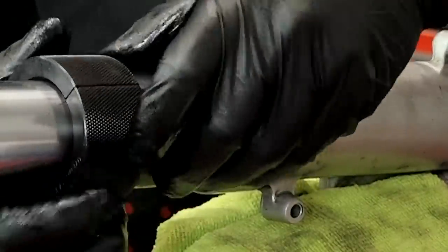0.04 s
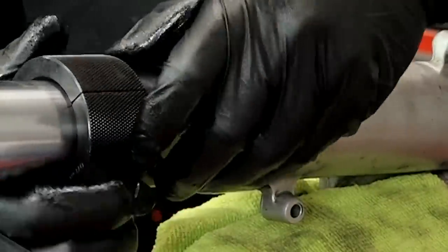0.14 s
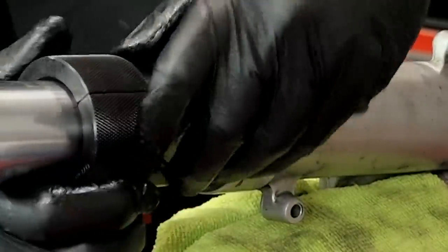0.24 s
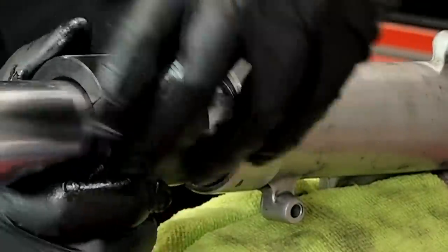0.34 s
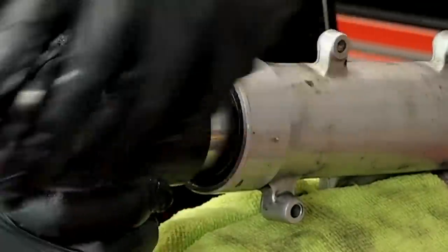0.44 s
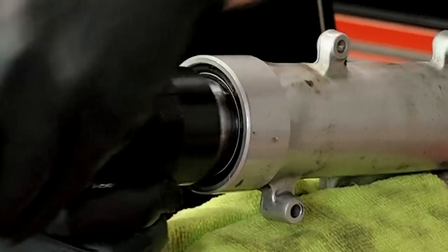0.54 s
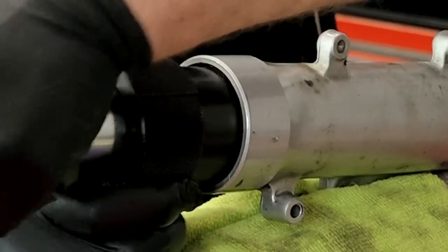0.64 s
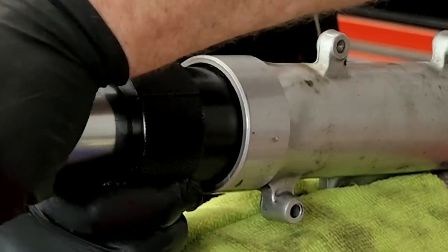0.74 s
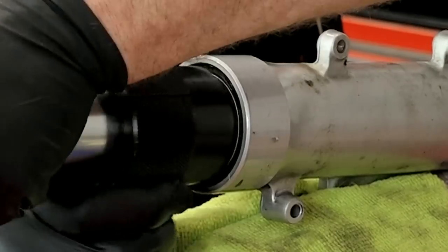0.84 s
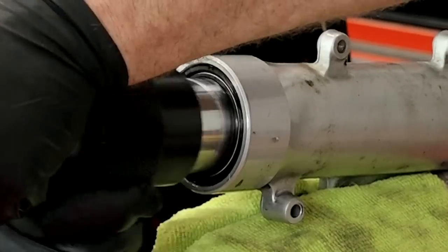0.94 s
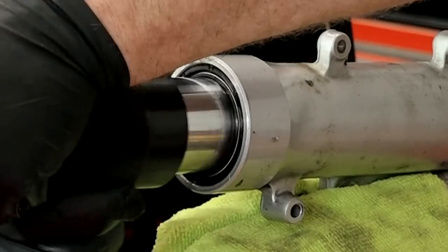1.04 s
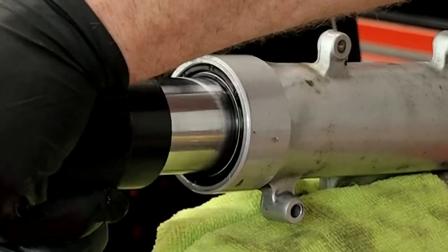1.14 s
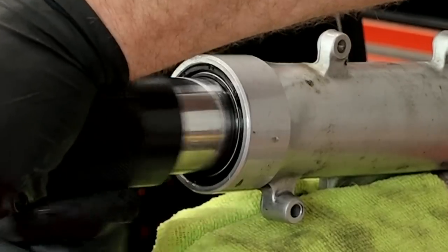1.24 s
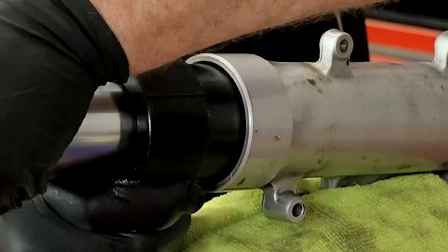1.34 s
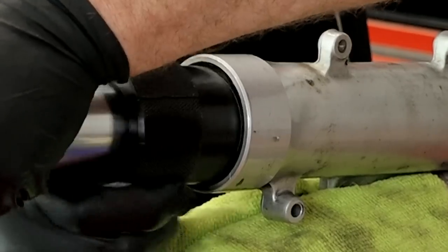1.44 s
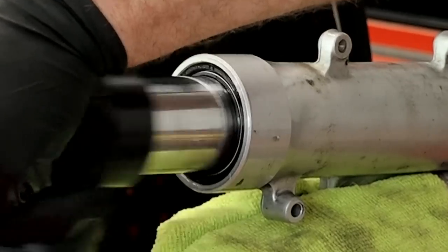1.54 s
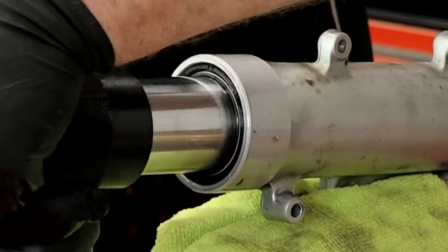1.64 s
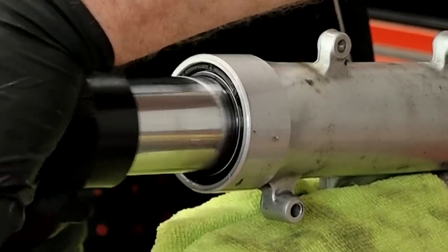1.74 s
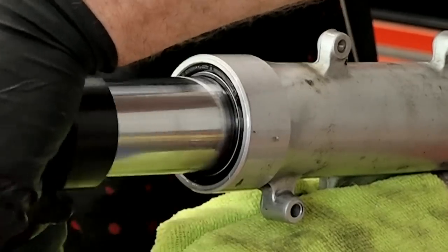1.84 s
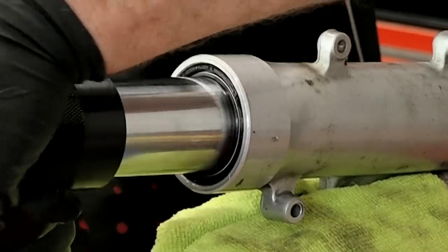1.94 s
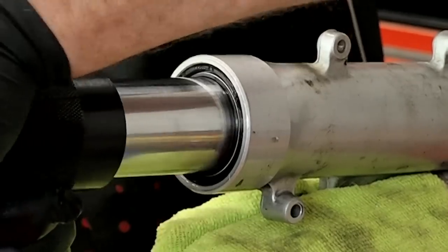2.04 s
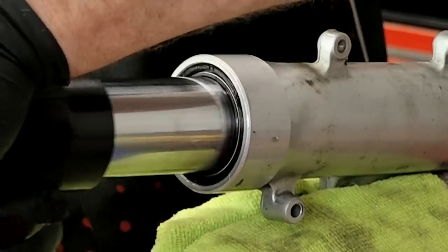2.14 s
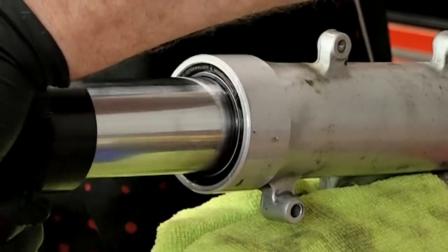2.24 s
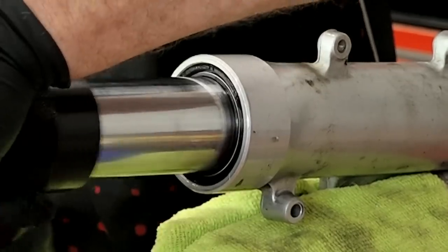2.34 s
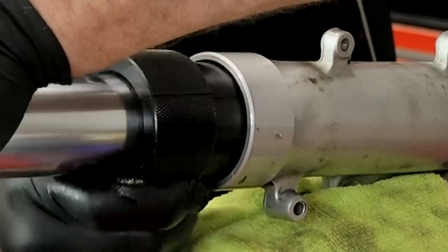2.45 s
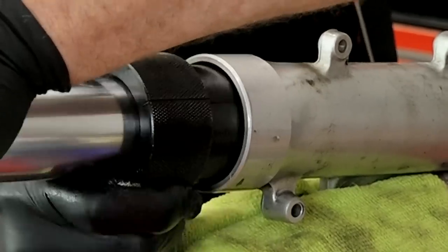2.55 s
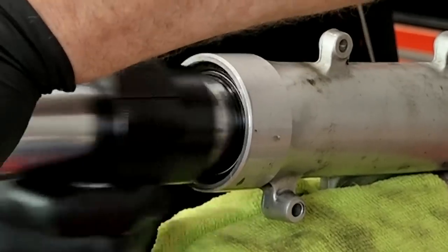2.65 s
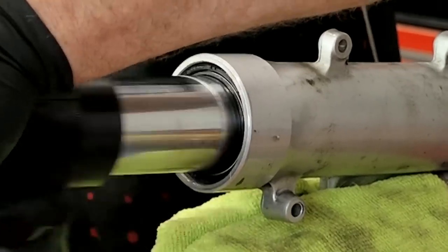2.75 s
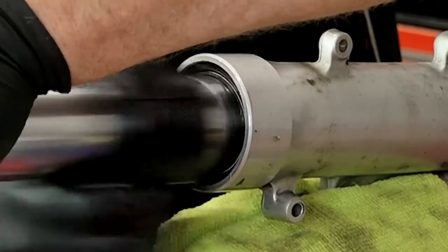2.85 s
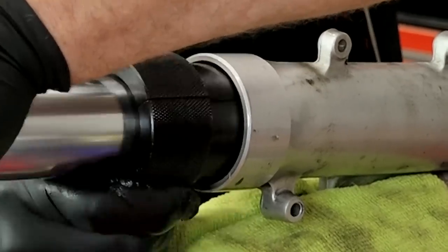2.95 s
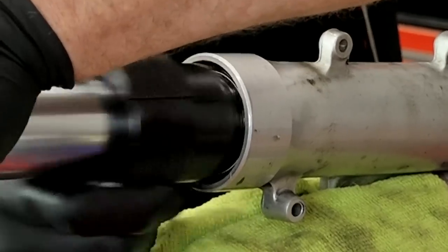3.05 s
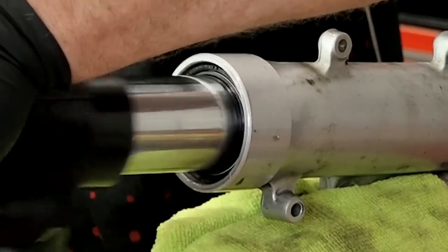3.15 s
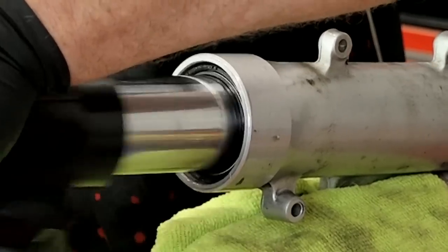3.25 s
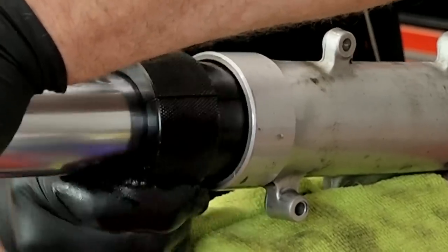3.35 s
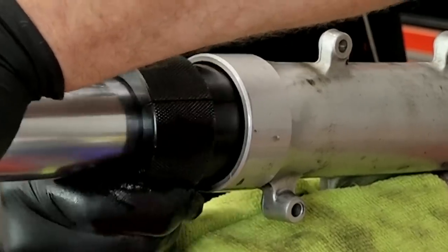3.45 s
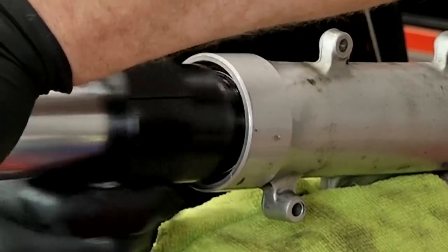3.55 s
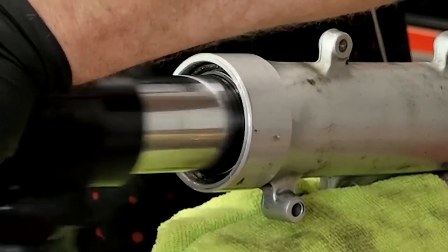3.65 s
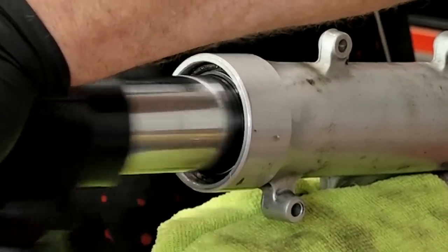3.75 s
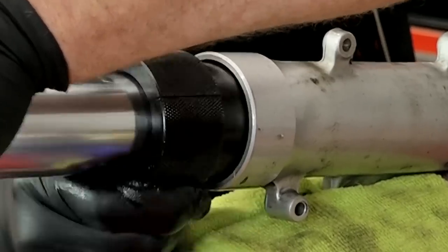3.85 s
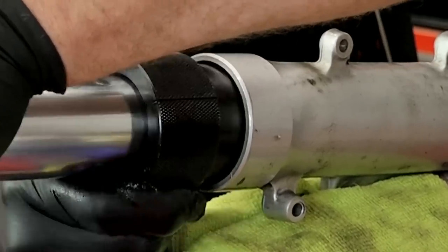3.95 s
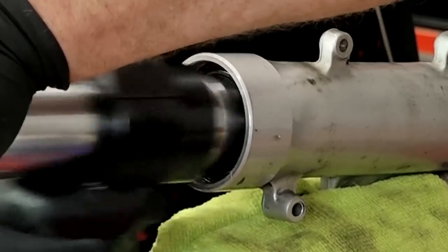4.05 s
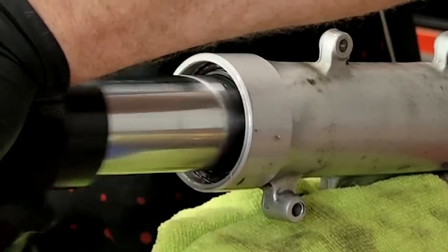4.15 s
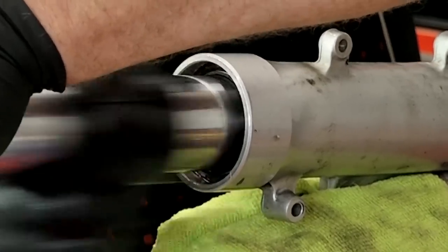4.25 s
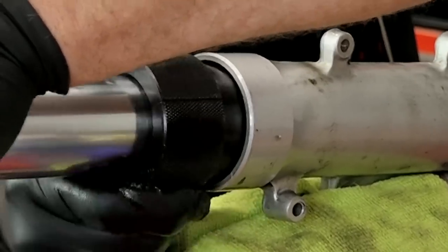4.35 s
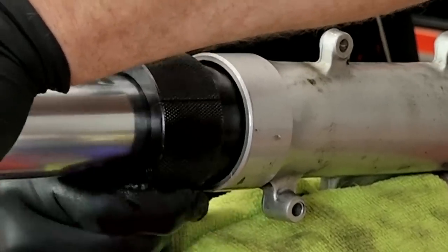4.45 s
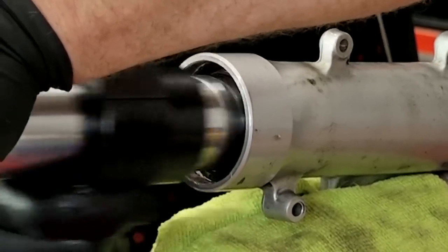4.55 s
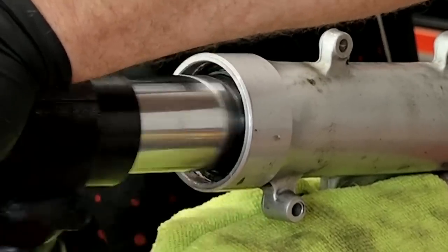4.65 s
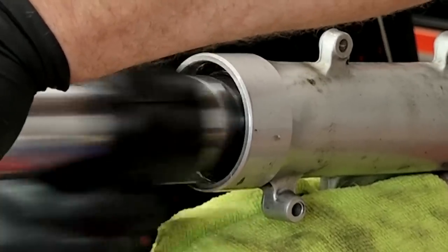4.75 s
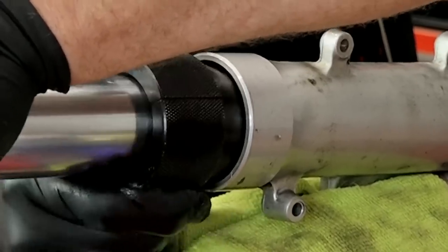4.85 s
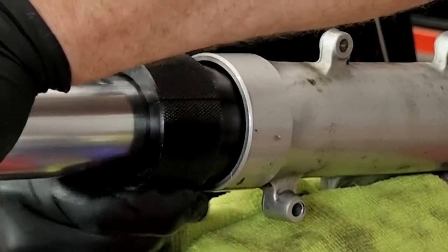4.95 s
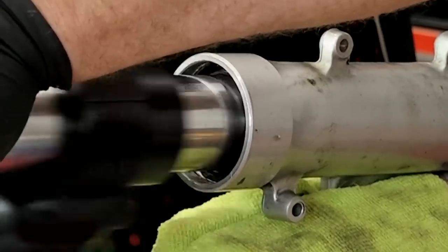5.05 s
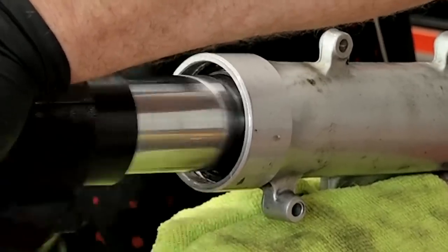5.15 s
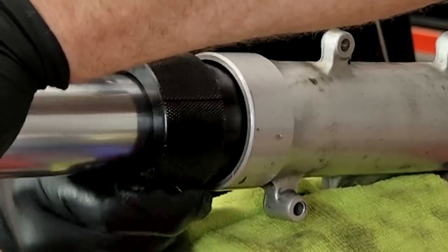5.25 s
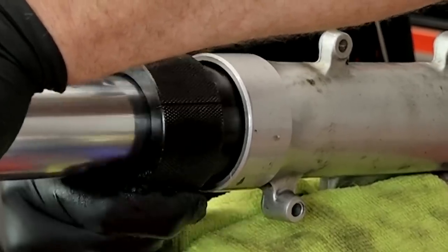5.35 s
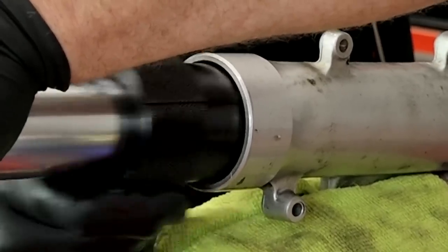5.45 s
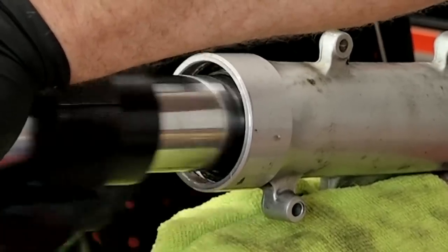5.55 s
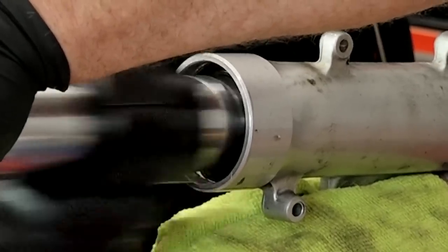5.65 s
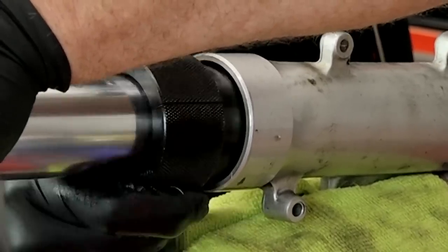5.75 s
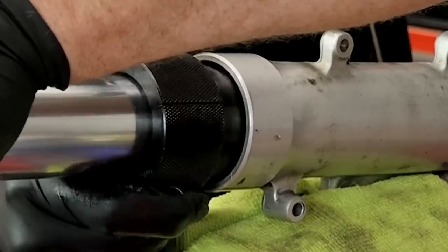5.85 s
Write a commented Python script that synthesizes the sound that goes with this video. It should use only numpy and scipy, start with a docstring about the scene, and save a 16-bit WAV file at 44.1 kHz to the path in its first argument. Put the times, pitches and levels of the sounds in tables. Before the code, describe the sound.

A steel sleeve hisses along a fork tube and slams a seal home in sharp, regular metallic knocks that turn brighter and harder.

```python
"""Driving a seal into a fork leg

In a workshop, gloved hands slide a steel driver sleeve along a fork tube and knock an oil seal into the leg.
The moving sleeve is shaped friction noise; its ticks, clacks, short squeaks and rebounds are contact bursts,
all but the ticks with damped modes. Each blow adds a thud and leg modes, harder and brighter near the seat.
The room answers all but the faint ticks and bumps; the close mono microphone clips the highest peaks softly."""
import sys
import numpy as np
from scipy import signal
from scipy.fft import rfft, irfft, next_fast_len
from scipy.io import wavfile
from scipy.ndimage import map_coordinates

SR = 44100
rng = np.random.default_rng(int(sys.argv[2]) if len(sys.argv) > 2 else 0)


def log_audio(samples):
    """Write samples as a 16-bit WAV file to the path given in sys.argv[1]."""
    # one column per channel
    frames = np.atleast_2d(samples).T
    # limit to full scale, then quantise
    limited = np.clip(frames, -1, 1)
    pcm = np.round(limited * 32767).astype(np.int16)
    wavfile.write(sys.argv[1], SR, pcm)


N = 260489
T = np.arange(8192) / SR  # time axis of one short sound, s

# blows on the seal: start_s, level_db, thud_db (against the blow), crack_hz
BLOWS = [(1.373, -17, -7, 1850), (2.495, -12.5, -6.5, 1920), (2.9369, -17.5, -2, 1820),
         (3.3835, -12, -3.5, 1720), (3.878, -14, -2.5, 1670), (4.351, -15, -1.5, 2030),
         (4.8449, -9.5, -8.5, 1934), (5.3120, -11, -7, 1940), (5.7543, -10, -8, 2380)]
# modes of the steel sleeve and tube: pitch_hz, level_db, t60_s
STEEL_MODES = [(1570, -4, .05), (2160, -2, .04), (2470, -1, .05), (3380, -6, .04), (3810, -3, .04),
               (4339, -6, .04), (5297, -4, .06), (5500, -4, .06), (5930, -6, .05), (6500, -9, .04),
               (8200, -9, .04), (8750, -8, .04), (9230, -9, .05)]
# broad colour of steel meeting steel: frequency_hz, level_db
CRACK_COLOUR = [(500, -16.5), (1150, -3), (1550, -1.5), (1880, 3), (2150, 1), (2480, 1), (3000, -1),
                (3700, 0.5), (4500, -8.5), (7000, -58)]
# bright edge of the steel: frequency_hz, level_db
TREBLE_COLOUR = [(2500, -33), (4000, 3.5), (4750, 1), (5450, 9.5), (6300, 1.5), (7300, -1), (8500, 1.5),
                 (10500, -9.5), (12800, -12.5), (16000, -20)]
# dull colour of the padded leg being bumped or shoved: frequency_hz, level_db
BUMP_COLOUR = [(20, -14), (50, -3), (110, 0), (220, -1), (400, -16), (1000, -50), (3000, -95)]

STEEL_DB, SCATTER_DB = -9, 1.5  # steel modes against the treble burst; random spread of mode levels


def amp(db):
    """Decibels to gain."""
    return 10 ** (np.asarray(db) / 20)


def unit(x):
    """Scale to rms 1."""
    return x / np.sqrt(np.mean(x ** 2) + 1e-20)


def normalised(x):
    """Scale to the energy of 5 ms at rms 1."""
    return x / np.linalg.norm(x) * np.sqrt(.005 * SR)


def along(points, hz):
    """Read (Hz, value) points on a log frequency axis."""
    point_hz, value = np.transpose(points)
    return np.interp(np.log(hz + 1), np.log(point_hz + 1), value)


def fade(t, t60):
    """Exponential decay, 60 dB down after t60 seconds."""
    return np.exp(-np.log(1000) * t / t60)


def add(track, s, sound):
    """Mix a sound into the track from time s."""
    part = track[round(s * SR):][:len(sound)]
    part += sound[:len(part)]


def wobble(rate):
    """A smooth random curve with rate knots a second."""
    knots = rng.standard_normal(int(N * rate / SR) + 4)
    return map_coordinates(knots, [np.arange(N) * rate / SR])


def noise(spectrum, size):
    """Steady coloured noise of rms 1."""
    gain = amp(along(spectrum, np.fft.rfftfreq(size, 1 / SR)))
    return unit(irfft(rfft(rng.standard_normal(size)) * gain, size))


def push(spectrum, size=4096):
    """One clean impulse through a causal (minimum-phase) colour."""
    cepstrum = irfft(np.log(amp(along(spectrum, np.fft.rfftfreq(size, 1 / SR)))))
    # fold the cepstrum forward in time, so that nothing sounds before the impulse
    cepstrum[1:size // 2] *= 2
    cepstrum[size // 2 + 1:] = 0
    impulse = irfft(np.exp(rfft(cepstrum)))
    return normalised(np.pad(impulse, (0, len(T) - size)))


def burst(spectrum, t60):
    """Chattering contact: a dying train of tiny random impacts, evened in spectrum and then coloured."""
    force = rng.standard_normal(len(T)) * fade(T, t60)
    phase = np.angle(rfft(force))
    even = irfft(np.exp(1j * phase), len(T)) * fade(T, 2 * t60)
    return normalised(signal.fftconvolve(even, push(spectrum))[:len(T)])


def ring(modes, scatter_db, attack):
    """Damped modes, struck a little differently each time."""
    hz, db, t60 = np.transpose(modes)[:, :, None]
    level, detune, phase = rng.standard_normal((3, len(modes), 1))
    waves = np.sin(2 * np.pi * (hz * (1 + .003 * detune) * T + phase))
    decaying = amp(db + scatter_db * level) * fade(T, t60) * waves
    return normalised(np.sum(decaying, 0) * (1 - np.exp(-T / attack)))


def crack(hz, t60, spread_db):
    """A steel contact: one strong resonance at hz over a broad clack."""
    # skirts of the contact resonance: frequency_ratio, level_db
    skirts = [(.2, -50), (.7, -20), (.88, -8), (1.0, 0), (1.12, -8), (1.4, -20), (4, -55)]
    resonance = burst(np.array(skirts) * [hz, 1], t60)
    return resonance + amp(spread_db) * burst(CRACK_COLOUR, t60)


def workshop(x, build_s):
    """The room's answer: bench reflections, a far-wall return and a diffuse tail with its own decay by pitch."""
    # decay of the diffuse tail: frequency_hz, t60_s
    tail_t60 = [(100, 1), (250, 0.76), (550, 0.8), (1000, 0.61), (2000, 0.57), (5500, 0.64), (9000, 0.52),
                (15000, 0.39)]
    # colour of the room: frequency_hz, level_db
    room_colour = [(60, -53), (110, -9), (150, -0.5), (210, 4.5), (330, 2.5), (560, 0.5), (900, -1),
                   (1400, 0.5), (2000, -7.5), (4000, -11.5), (9000, -16.5), (15000, -23.5)]
    # far walls against the diffuse tail: frequency_hz, level_db
    far_colour = [(300, 2), (1000, -3.5), (2500, -14), (8000, -4)]
    # close bench reflections against the diffuse tail: frequency_hz, level_db
    bench_colour = [(300, -24), (800, 4), (1600, 3), (4000, 11), (10000, -18)]
    far_delay_s = 0.05
    hz, t, z = signal.stft(rng.standard_normal(SR), SR, nperseg=256)
    # both decays here come on top of the diffuse tail's own
    bench = amp(along(bench_colour, hz))[:, None] * fade(t, 0.093)
    arrival = .5 + .5 * np.tanh((t - far_delay_s) / .004)
    far_wall = amp(along(far_colour, hz))[:, None] * arrival * fade(np.abs(t - far_delay_s), 0.47)
    tail = fade(t, along(tail_t60, hz)[:, None]) * (1 - np.exp(-t / build_s))
    shape = tail * (1 + bench + far_wall)
    # each band gets the same energy before the room's colour
    shape *= amp(along(room_colour, hz))[:, None] / np.sqrt(np.mean(shape ** 2, 1, keepdims=True) * SR)
    response = signal.istft(z * shape, SR, nperseg=256)[1]
    return signal.fftconvolve(x, response)


def sleeve_speed():
    """Sleeve speed as hiss amplitude: slow slides, a quickening thrust into each blow, draws back between."""
    # the sleeve eased along the tube while it is lined up: start_s, end_s, hiss_db
    slides = [(0.29, 0.43, -60.5), (0.55, 0.82, -60.5), (0.886, 1.062, -54.5), (1.095, 1.19, -61),
              (1.512, 1.672, -47.5), (1.73, 1.944, -57.5), (2.193, 2.296, -58)]
    draw_from, draw_to, draw_db = 0.4, 0.79, -49  # shares of the time between two blows
    thrust_s, thrust_db = 0.079, -44.5
    speed = np.zeros(N)
    blow_times = np.transpose(BLOWS)[0]
    run = blow_times[1:]  # the first blow stands alone
    draws = [(s + draw_from * gap, s + draw_to * gap, draw_db) for s, gap in zip(run, np.diff(run))]
    for start, end, db in list(slides) + draws:
        size = max(round((end - start) * SR), 2)
        stroke = np.abs(np.sin(np.linspace(0, np.pi, size))) ** 0.69
        add(speed, start, amp(db) * stroke)
    for s in blow_times:
        thrust = np.sin(np.linspace(0, np.pi / 2, round(thrust_s * SR)))
        add(speed, s - thrust_s, amp(thrust_db) * thrust)
    return speed


def background(speed):
    """Low workshop air, and hands that change grip, rub as they move and bump the leg."""
    # low colour of the air and the hands: frequency_hz, level_db
    low_colour = [(15, -54), (25, -47), (53, -3.5), (120, 1), (157, 1.5), (335, -1), (503, -6), (591, 2.5),
                  (695, -9), (988, -7.5), (1740, -15.5), (2550, -15), (3250, -19), (6740, -23),
                  (16000, -29)]
    # hands bumping the padded leg: start_s, level_db
    bumps = [(0.596, -46), (.765, -39), (1.079, -53), (2.195, -45.5)]
    regrip_s, regrip_width_s, regrip_db = 0.68, 0.15, -57.5
    handling_db = -11  # rub of the hands against the sleeve's speed
    air = amp(-57.5 - 1.5 * wobble(rate=6.92)) * noise(low_colour, N)
    regrip = amp(regrip_db) * np.exp(-((np.arange(N) / SR - regrip_s) / regrip_width_s) ** 2)
    out = air + (regrip + amp(handling_db) * speed) * noise(low_colour, N)
    for s, db in bumps:
        add(out, s, amp(db) * burst(BUMP_COLOUR, t60=0.19))
    return out


def ticks():
    """The sleeve's play on the tube makes faint, dry ticks at random moments."""
    ticks_per_s, softest_db, range_db, centre_hz = 2.2, -58.5, 8, 2620
    out = np.zeros(N)
    for when, size, pitch in rng.random((round(ticks_per_s * N / SR), 3)):
        hz = centre_hz * 2 ** (pitch - .5)  # within half an octave either way
        tick = crack(hz, t60=0.012, spread_db=1)
        add(out, when * N / SR, amp(softest_db + range_db * size) * tick)
    return out


def sleeve_contact(db, ring_db, hz):
    """A short contact of sleeve and tube: a click with some ring; soft contacts sound hollower."""
    # the sleeve's hollow note and thin ping: pitch_hz, level_db, t60_s
    hollow_modes = [(600, 0, .06), (770, -4, .03), (960, -7, .025), (5420, -11, .06), (9200, -21, .05)]
    hollow_db, hollow_slope = -13.5, 0.47  # level at a 0 dB contact; dB gained for each dB softer
    steel = amp(STEEL_DB) * ring(STEEL_MODES, SCATTER_DB, attack=0.0033)
    bright = burst(TREBLE_COLOUR, t60=0.019) + steel
    click = crack(hz, t60=.013, spread_db=-6)
    hollow = amp(hollow_db - hollow_slope * db) * ring(hollow_modes, SCATTER_DB, attack=0.00039)
    return amp(db) * (click + amp(ring_db) * (bright + hollow))


def sleeve_contacts():
    """Clacks, short squeaks and rebounds of the sleeve on the tube, and the workshop's answer."""
    # clacks, short squeaks and rebounds: start_s, level_db, ring_db (against the click), click_hz
    contacts = [(0.257, -55, -14, 2520), (.329, -68, 1, 2500), (.749, -45.5, 1, 2000),
                (1.133, -61.5, 1, 1940), (1.282, -33.5, -10, 2400), (1.62, -34, -16, 3800),
                (1.717, -36.5, -14, 3740), (2.025, -53.5, -9, 2150), (2.2761, -32, -4.5, 2270),
                (2.439, -25, 1, 2810), (2.947, -22.5, 2, 3600), (3.226, -40, -6.5, 3620),
                (3.3392, -39, -7, 1970), (3.408, -26, 0.5, 3500), (3.715, -48.5, -2.5, 1940),
                (3.833, -51, -3.5, 2000), (3.867, -28.5, -10.5, 2620), (4.0543, -34, -18, 2180),
                (4.1478, -33.5, -5.5, 2040), (4.2396, -30, -4.5, 2410), (4.251, -40, -1.5, 2060),
                (4.3862, -28, -5.5, 2390), (4.519, -40.5, -8.5, 2200), (4.609, -40.5, -23, 2020),
                (4.8368, -33.5, -1, 2400), (4.854, -21.5, 7.5, 2400)]
    out = np.zeros(N)
    for s, db, ring_db, hz in contacts:
        contact = sleeve_contact(db, ring_db, hz)
        add(out, s, contact)
        add(out, s, amp(-6) * workshop(contact, build_s=0.0017))
    return out


def swish(ripple_db):
    """Friction noise whose fine resonances come and go as time passes."""
    # colour of the sleeve rubbing on the tube: frequency_hz, level_db
    hiss_colour = [(400, -14), (1000, -5), (1600, -5), (2300, -0.5), (3250, -11), (4200, 3), (4550, -6),
                   (5000, -8), (5450, 1), (5950, 4.5), (6500, -5), (7300, -4.5), (9000, -8), (9900, -16),
                   (10400, -11), (12200, -21), (14000, -13), (16000, -24)]
    hz, t, z = signal.stft(noise(hiss_colour, N), SR, nperseg=512)
    # a random field with a knot every 200 Hz and every 80 ms
    cells = np.meshgrid(hz / 200, t / .08, indexing="ij")
    field = map_coordinates(rng.standard_normal((128, 128)), cells, mode="mirror")
    return unit(signal.istft(z * amp(ripple_db * field), SR, nperseg=512)[1][:N])


def sliding(speed):
    """The sleeve hisses on the tube, louder and brighter with its speed."""
    # a fast random flutter in level roughens the hiss, over a slower one
    fast_flutter = amp(1.2 * wobble(rate=147))
    slow_flutter = amp(0.75 * wobble(rate=39))
    friction = slow_flutter * fast_flutter * swish(ripple_db=3)
    # slow sliding is dull; the airy top opens up with speed
    low_pass = signal.butter(2, 7000, fs=SR, output="sos")
    dull = signal.sosfiltfilt(low_pass, friction)
    opening = 0.063 + 0.89 * np.sqrt(np.abs(speed) / speed.max())
    hiss = speed * (dull + opening * (friction - dull))
    room = amp(-1.5) * workshop(hiss, build_s=0.008)[:N]
    return amp(1.1) * (hiss + room)


def seated(giving, home, s):
    """A quality of the blow at time s, between its value on a giving seal and on a seated one."""
    seated_at_s, seating_s = 3.926, 0.32  # the change is spread over a blow or two
    share = .5 + .5 * np.tanh((s - seated_at_s) / seating_s)
    return giving + share * (home - giving)


def tube_ring(seconds):
    """Lightly damped notes of the long tube linger after a blow and are choked to silence at the end."""
    # the long tube, before the choke: pitch_hz, level_db, t60_s
    tube_modes = [(846, -28.5, 2.16), (2475, -28.5, 0.37)]
    t = np.arange(round(seconds * SR)) / SR
    notes = sum(amp(db) * np.sin(2 * np.pi * hz * t) * fade(t, t60) for hz, db, t60 in tube_modes)
    return notes * np.sqrt(1 - t / t[-1])


def knocks():
    """Blows crack in the sleeve and thud in the leg; once seated, the steel rings on and the bounce grows."""
    # modes of the fork leg: pitch_hz, level_db, t60_s
    leg_modes = [(154.5, -23, 0.095), (210.8, -21.5, 0.2), (293.4, -15.5, 0.059), (407, -10.5, 0.038),
                 (464, -8.5, 0.074), (563, 5, 0.046), (676, -15, 0.13)]
    # upper leg modes, which wake as the seal meets its seat: pitch_hz, level_db, t60_s
    seat_modes = [(789, 3.5, 0.026), (844, -6, 0.039), (890, -7, 0.085), (948, 4.5, 0.04),
                  (1034, -19.5, 0.19)]
    # colour of the thud: frequency_hz, level_db
    thud_colour = [(30, -21.5), (110, -6), (200, -8), (350, -1.5), (550, 2), (930, -5.5), (1250, -12.5),
                   (2000, -21), (5000, -64)]
    out = np.zeros(N)
    linger = tube_ring(seconds=0.51)
    # the slim leg radiates little below 160 Hz
    low_cut = signal.butter(2, 160, "high", fs=SR, output="sos")
    for s, db, thud_db, hz in BLOWS:
        chatter_t60 = seated(0.016, 0.053, s)
        treble = amp(seated(-8, -2, s))
        steel = amp(STEEL_DB) * ring(STEEL_MODES, SCATTER_DB, attack=0.0011)
        edge = treble * (burst(TREBLE_COLOUR, chatter_t60) + steel)
        strike = amp(-1.5) * crack(hz, chatter_t60, spread_db=seated(-1, -0.5, s)) + edge
        lower = ring(leg_modes, SCATTER_DB, attack=0.0039)
        upper = amp(seated(-5.5, 3.5, s)) * ring(seat_modes, SCATTER_DB, attack=0.00098)
        leg = amp(thud_db) * (lower + upper)
        thump = amp(thud_db + 0.35) * burst(thud_colour, t60=0.014)
        # the blow shoves the leg into its cloth-covered rest
        shove = amp(seated(-28.5, -42, s)) * push(BUMP_COLOUR)
        add(out, s, amp(db) * (signal.sosfilt(low_cut, strike + leg + thump) + shove))
        # the sleeve bounces and lands 9.3 ms later
        add(out, s + 0.0093, sleeve_contact(db + seated(-20.5, -12.5, s), ring_db=-0.5, hz=2440))
        # the whole fork radiates a broader, denser sound into the room
        body = amp(-0.85) * leg + amp(thud_db + 1.46) * burst(thud_colour, t60=0.012)
        shimmer = amp(seated(0, -1, s)) * burst(CRACK_COLOUR, t60=0.0063)
        shimmer += treble * burst(TREBLE_COLOUR, chatter_t60)
        shimmer += amp(seated(-15, -3.5, s)) * burst(TREBLE_COLOUR, t60=0.024)
        radiated = amp(db + seated(-2, 0.14, s))
        add(out, s, radiated * workshop(body + shimmer, build_s=0.005))
        add(out, s, radiated * linger)
    return out


def scene():
    """One close microphone feeds both channels."""
    speed = sleeve_speed()
    mono = background(speed) + ticks() + sleeve_contacts() + sliding(speed) + knocks()
    return np.tile(mono, (2, 1))


def record(dry):
    """The peaks clip softly; nothing is kept from 16 kHz up."""
    clipped = dry / (1 + np.abs(dry) ** 6) ** (1 / 6)
    size = next_fast_len(N + SR // 2)
    kept = np.fft.rfftfreq(size, 1 / SR) < 16000
    return irfft(rfft(clipped, size) * kept, size)[:, :N]


dry = scene()
out = record(dry)
log_audio(out)
```